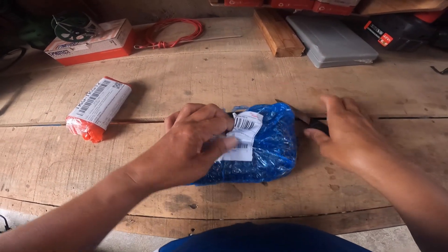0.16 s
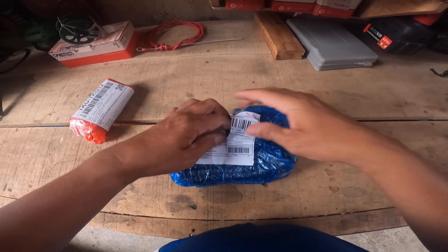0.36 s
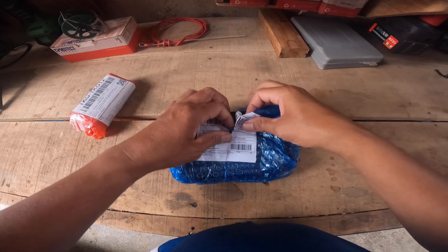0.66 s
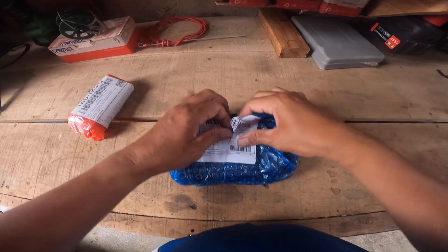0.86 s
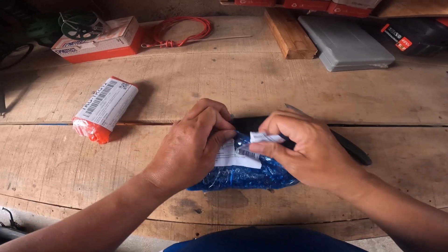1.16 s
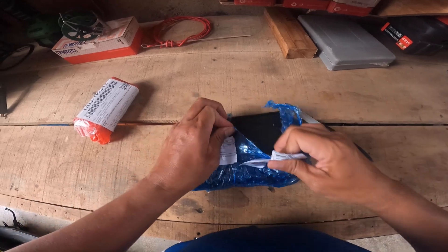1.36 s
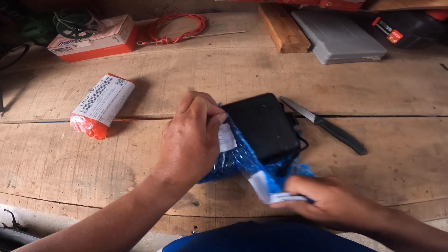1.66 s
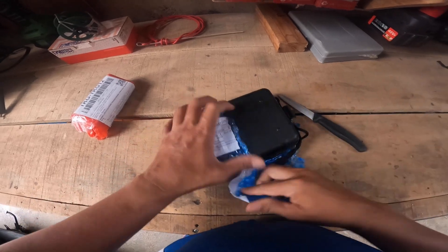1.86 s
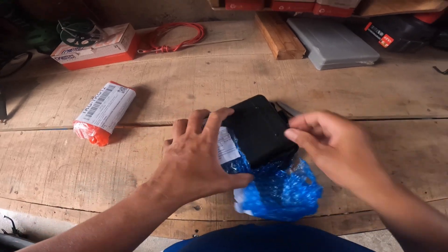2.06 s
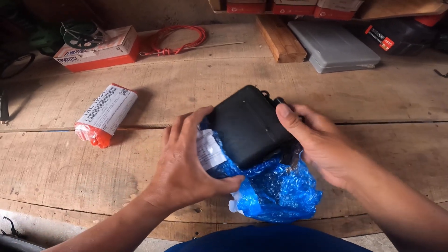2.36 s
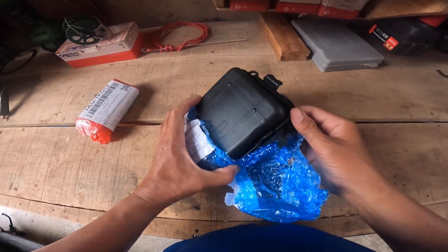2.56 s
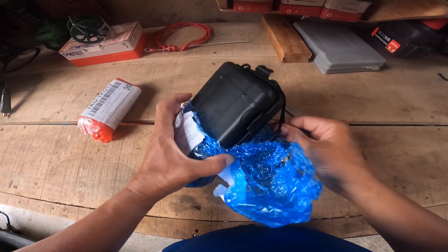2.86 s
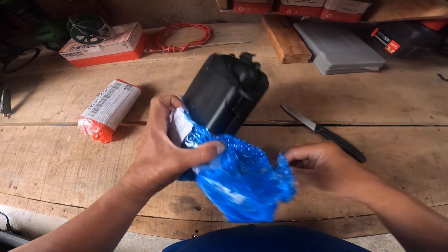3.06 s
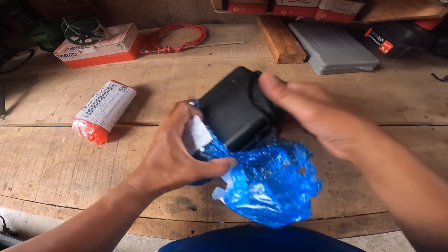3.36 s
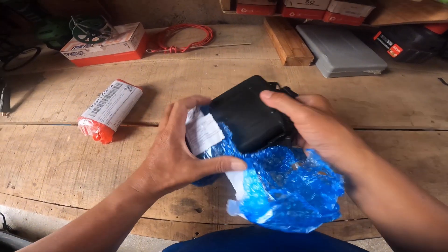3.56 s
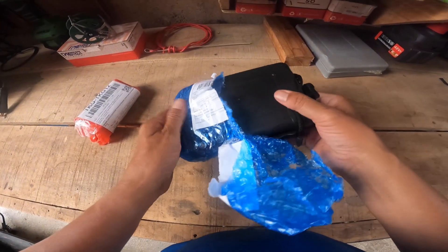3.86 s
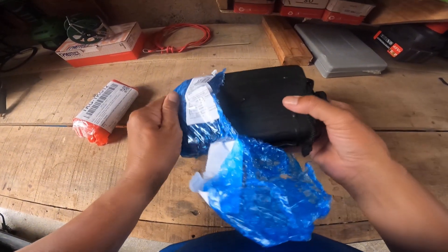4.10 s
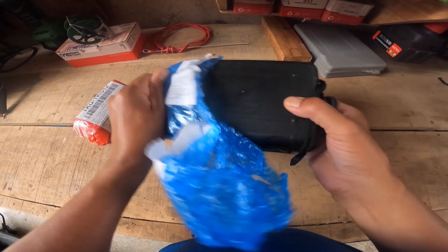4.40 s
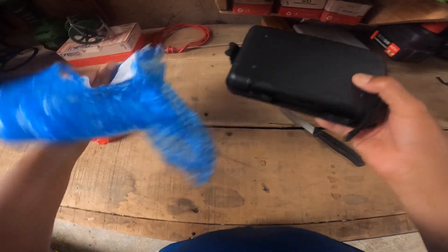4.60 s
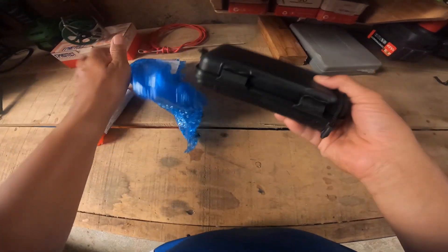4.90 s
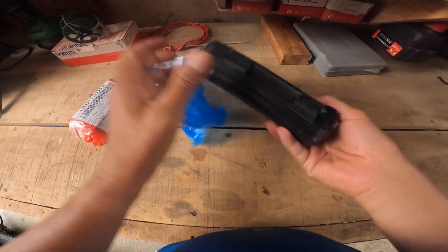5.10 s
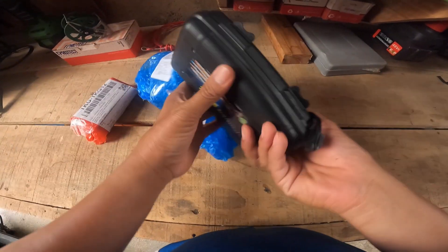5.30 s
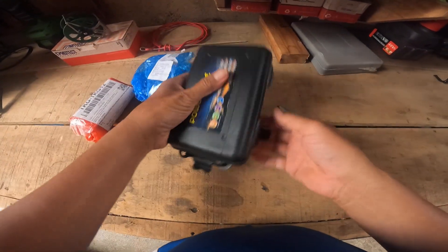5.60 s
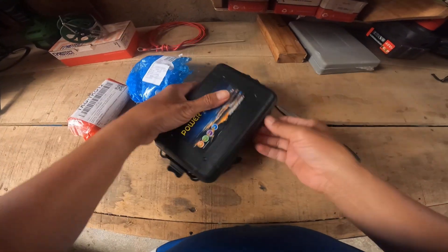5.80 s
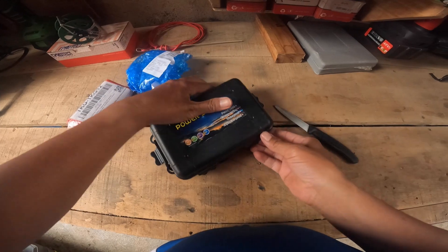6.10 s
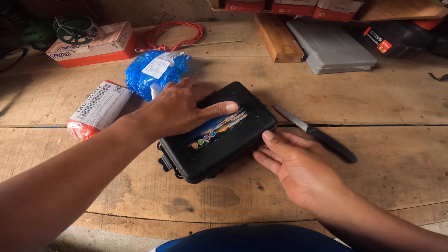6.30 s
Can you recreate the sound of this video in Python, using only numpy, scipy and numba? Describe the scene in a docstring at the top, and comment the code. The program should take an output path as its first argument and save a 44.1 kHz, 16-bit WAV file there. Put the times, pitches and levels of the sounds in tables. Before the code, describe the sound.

A small blade drops and bounces on a wooden bench in a quick rattle. Hands then tear crackly plastic film, with dense rustling, bright snaps and short rips, strongest between one and two seconds and around four. A hard plastic case knocks and creaks as it is pulled free, then thumps onto the bench. Close stereo chest microphones in a small dry workshop, with faint low rumble.

```python
"""A workshop bench: hands tear bubble wrap off a hard plastic case, heard by two microphones on the chest.
The film crackles and snaps: many short noise bursts, each sent through a broad resonance.
A knife clatters down and the case knocks: sets of fading sine tones. The case creaks when dragged: small jerks
keep its tones ringing. A low rumble of filtered noise lies beneath. A limiter turns everything down
around the hardest peaks, then lets the level creep back."""
import sys
import numpy as np
from scipy import signal
from scipy.fft import rfft, irfft, next_fast_len
from scipy.io import wavfile
from scipy.ndimage import uniform_filter1d
from numba import njit

SR = 44100
rng = np.random.default_rng(int(sys.argv[2]) if len(sys.argv) > 2 else 0)


def dump_mix(stems):
    """Bounce the given channels to the path in sys.argv[1] as a 16-bit WAV at rate SR."""
    frames = np.atleast_2d(stems).T  # one column per channel
    limited = np.clip(frames, -1, 1)  # hard clip at full scale
    pcm = np.round(limited * 32767).astype(np.int16)
    wavfile.write(sys.argv[1], SR, pcm)


N = 284356

# Workshop rumble over time: time_s, lower_drone_db, upper_drone_db, broad_noise_db
RUMBLE_LEVELS = [(0, -38, -35, -24), (.21, -43, -48, -28), (.42, -32, -46, -34), (.6, -38, -38, -26.5),
                 (.82, -27.5, -22.5, -32), (1.1, -30, -37, -29), (1.45, -35, -30, -33),
                 (1.6, -40, -33.5, -32), (1.75, -28, -28, -37), (2.15, -40, -53, -31),
                 (2.5, -32, -38, -27.5), (2.75, -31, -43, -27.5), (2.89, -24, -33, -28.5),
                 (3.1, -35, -34, -33.5), (3.4, -28.5, -37, -33), (3.64, -42, -25.5, -27),
                 (3.81, -35, -54, -30.5), (4.2, -40, -59, -33), (4.54, -29, -26.5, -46),
                 (4.8, -35, -41, -33.5), (4.96, -24, -31, -34), (5.15, -24, -34, -33.5),
                 (5.5, -27, -42, -29), (5.8, -40, -26.5, -27.5), (6.07, -28.5, -36, -30),
                 (6.4, -32, -23, -28)]
# Tone colour of the broad rumble noise, before its level is set: pitch_hz, relative_level_db
RUMBLE_COLOUR = [(20, -7), (33, 2), (45, -5), (70, -2), (110, -1), (200, -7), (300, -13.5), (500, -11.5),
                 (750, -39), (1500, -34), (3300, -64)]
# The two wavering drones, lower then upper: pitch_hz, width_hz
DRONES = [(48, 2.3), (65, 3.6)]

# Blows on the bench, first the dropped knife bouncing, later the weight of the case:
# start_s, peak_db (before BENCH_DB), spot_hz (where it rings most), free_ring_share (of the ring time)
BENCH_BLOWS = [(.047, -11, 310, 0.5), (.0765, 2, 1030, 0.33), (.083, 1, 400, 0.79), (.098, -4, 500, 0.44),
               (.118, -5, 790, 0.49), (.126, -6, 114, 0.63), (.142, -8.5, 400, 1), (.1655, -6, 1500, 0.21),
               (.185, -13, 450, .7), (.2345, -3, 597, 0.27), (.243, 9.5, 510, 0.7),
               (.2615, 2.5, 1350, 0.32), (.275, -2, 700, 0.82), (.288, -15, 250, 0.84),
               (.30, -4, 201, 0.91), (.312, -8, 1300, 0.43), (.336, -15, 300, 0.99),
               (.9775, -4.5, 880, 0.15), (.995, -17, 130, 0.35), (2.215, -15.5, 179, 0.31),
               (3.885, -9, 110, 0.15), (4.518, -5.5, 130, 0.19), (4.607, -5, 90, 0.15),
               (5.452, -7.5, 107, .4), (5.764, -10, 110, 0.71), (5.8375, -3.5, 1500, 0.57),
               (6.0245, -2, 2010, 0.21)]
# Ringing tones of planks and blade: pitch_hz, relative_level_db, t60_s (time to fade by 60 dB if free)
BENCH_TONES = [(99, 1.5, 0.44), (140, -6.5, 0.14), (180.6, 3, 0.38), (250, 3.5, 0.12), (321.7, 3, 0.18),
               (400, 2.5, 0.095), (474, 2, 0.12), (610, 11.5, 0.045), (744, -0.5, 0.09), (949, 1.5, 0.18),
               (1030, 3.5, 0.083), (1350, 2.5, 0.28), (1487, 5, 0.11), (1760, 5, 0.073), (2140, -17, .06),
               (2560, 3, 0.097)]
BENCH_DB = -1.0

# Clearest bumps of the case on bench and fingers: start_s, peak_db, spot_hz (where it rings most)
CASE_KNOCKS = [(.5754, -14, 413), (.8586, -13, 410), (.936, -11.5, 666), (.978, -6.5, 405),
               (.998, -3.5, 880), (1.0128, -3, 210), (1.0645, -11, 400), (1.2519, -12, 362),
               (1.3544, -5, 320), (1.3958, -2.5, 340), (1.4435, -11.5, 513), (1.5036, -11.5, 533),
               (1.5516, -2.5, 680), (1.5748, -8.5, 650), (1.6579, -13, 685), (1.8728, -13.5, 850),
               (2.1286, -13, 725), (2.2123, -7, 302), (2.5891, -12.5, 226), (2.649, -17, 596),
               (2.8693, -8, 960), (3.0667, -3.5, 470), (3.1227, -8.5, 490), (3.1459, -9, 448),
               (3.6135, -11.5, 480), (3.6448, 2, 830), (3.7524, -7, 755), (3.8896, -4.5, 420),
               (4.2106, -4, 825), (4.2465, -3, 950), (4.5174, -3, 303), (4.5437, 0.5, 332),
               (4.5733, -11.5, 253), (4.9876, -18.5, 302), (5.3401, -14, 332), (5.4432, -13.5, 310),
               (5.5064, -5.5, 525), (5.5459, -7, 480), (5.573, -2.5, 480), (5.6827, -14, 360),
               (5.7684, -1, 230), (5.8402, 10, 670), (5.9267, -11, 510), (5.9417, -16, 490),
               (6.0035, -5, 370), (6.0273, -8, 1030), (6.0456, -14, 410), (6.1282, -8, 860),
               (6.3087, -13.5, 990)]
# Ringing tones of the case: pitch_hz, relative_level_db, t60_s (time to fade by 60 dB if free)
CASE_TONES = [(186, 1.5, 0.11), (285, -5.5, 0.09), (304, 0.5, 0.1), (360, 5, 0.086), (430, -2, 0.096),
              (480, 0, 0.097), (535, -0.5, 0.1), (700, -4, 0.13), (880, 10.5, 0.028), (1150, 9.5, 0.066),
              (1800, -21, .04), (2230, 7, 0.031)]
GRIP = 0.32  # share of the free ring time left by the fingers
# Light random taps: number per second; typical peak above the rustle, its spread; middle pitch
TAPS_PER_S, TAP_DB, TAP_SCATTER_DB, TAP_HZ = 6, 7, 1.5, 650
# Case dragged through fingers and over the bench:
# start_s, length_s (up to the fade-out), level_db (before the fades), first_spot_hz, last_spot_hz
CASE_DRAGS = [(0.971, 0.065, -29, 400, 375), (1.341, .065, -31, 345, 362), (2.18, 0.1, -27, 357, 450),
              (3.063, 0.31, -32, 430, 450), (4.506, 0.099, -22.5, 360, 400), (5.43, .18, -23, 360, 650),
              (5.86, 0.23, -36, 430, 330)]
DRAG_ATTACK_S, DRAG_RELEASE_S = 0.01, 0.027

# How hard the hands work the film, pulls and pauses: time_s, rustle_db
HANDLING = [(0, -21), (.12, -24.5), (.25, -30.5), (.47, -31.5), (.59, -22.5), (.64, -29), (.7, -26.5),
            (.97, -23), (1.08, -24), (1.24, -22), (1.35, -14), (1.41, -21.5), (1.43, -38), (1.47, -29.5),
            (1.52, -25), (1.58, -27.5), (1.6, -50), (1.63, -27), (1.85, -26.5), (1.89, -18.5), (1.94, -25),
            (2.26, -31), (2.36, -30.5), (2.43, -34.5), (2.48, -30), (2.56, -33), (2.66, -20.5), (2.76, -27),
            (2.89, -22.5), (2.94, -28.5), (3.05, -21.5), (3.11, -28.5), (3.13, -25.5), (3.18, -28.5),
            (3.3, -28), (3.34, -31), (3.44, -32.5), (3.48, -45), (3.53, -30.5), (3.61, -22), (3.75, -23.5),
            (3.81, -29.5), (3.9, -23.5), (4, -19), (4.06, -32), (4.13, -25.5), (4.17, -31), (4.24, -23),
            (4.27, -48), (4.31, -32.5), (4.4, -29.5), (4.44, -26), (4.6, -19.5), (4.65, -35), (4.85, -26.5),
            (4.97, -29), (5.03, -39), (5.14, -39), (5.24, -26.5), (5.58, -24.5), (5.67, -38.5),
            (5.73, -28.5), (5.8, -30), (5.87, -32.5), (5.96, -28), (6.07, -28), (6.16, -21.5),
            (6.25, -30.5), (6.3, -24), (6.45, -28)]
# The patch being worked: time_s, left_minus_right_db, patch_hz (where it rings),
# large_folds_db and small_creases_db (both against the rustle)
PATCH = [(0, -1, 2970, -8, -0.5), (.25, 0.5, 2110, 0.5, -0.5), (.4, -1.5, 2000, -8, -3),
         (.6, 0, 3570, -10.5, -4), (1.25, -.5, 3270, -11, -2.5), (1.55, -1, 3650, 2, 1.5),
         (2, -.5, 3630, -6, 2), (2.3, -0.5, 2970, -1.5, 0.5), (2.8, -1.2, 3830, -4, 1.5),
         (3.2, 0, 3770, -1.5, 4), (3.45, -0.5, 2800, -7.5, -2), (3.65, -.8, 3800, 0.5, 6),
         (4, 0, 3930, -10.5, -2.5), (4.5, 0, 3530, -7, 0.5), (5.1, 2.5, 3540, -6, 2),
         (5.4, .5, 3420, -3, 1.5), (5.55, -1, 2500, 0.5, 0.5), (5.72, 1.5, 3020, -0.5, 2),
         (5.86, 0.5, 1900, 4.5, 2), (6.05, .5, 2210, 2.5, -0.5), (6.18, 1.2, 3730, -4, -2.5),
         (6.45, 1, 3200, -5.5, -4)]
# Loudest creases snapping, the hardest far above the limiter's ceiling: start_s, peak_db, centre_hz
LOUD_SNAPS = [(.0466, -1, 2770), (.057, -4, 2500), (.0768, -1, 1550), (.1415, -8, 2140), (.1664, -19, 1460),
              (.26, 2, 1350), (.3645, -0.5, 2260), (.372, -5.5, 1840), (.5845, -3.5, 4070),
              (.6833, -2, 5230), (.771, 0, 3260), (.7809, -0.5, 3530), (.949, -3.5, 5190), (.969, -3, 3650),
              (.9784, -10, 1150), (1.004, 0.5, 1600), (1.0113, 4, 4020), (1.0375, -6, 1900),
              (1.1195, 1, 2970), (1.1457, 2, 3800), (1.1746, 0.5, 4450), (1.2517, 5, 2680),
              (1.3039, -1, 4140), (1.3312, -1, 3720), (1.3525, 4.5, 3300), (1.3764, 0, 4060),
              (1.3954, 2.5, 2330), (1.4152, 11.5, 4130), (1.444, 4, 3360), (1.523, -2, 4150),
              (1.5628, 3, 4740), (1.5783, 15, 3830), (1.6143, -17, 3920), (1.631, 5, 3600),
              (1.6399, 2, 3460), (1.6552, 2.5, 4070), (1.6836, 4, 3150), (1.6984, -1, 4150),
              (1.7086, 4.5, 4600), (1.7664, -3, 5040), (1.8673, 3, 5670), (1.8768, 0, 4220),
              (1.8853, -8, 3540), (1.913, -7, 4520), (2.0439, -0.5, 6020), (2.129, -2, 1700),
              (2.199, -4, 1970), (2.269, -1.5, 4970), (2.654, -2.5, 2700), (2.7419, -8, 3710),
              (2.794, -6, 2410), (2.818, -2.5, 4540), (2.935, -1.5, 1820), (3.0584, 2, 4470),
              (3.0678, 16, 4430), (3.1205, 2, 2820), (3.1434, 1, 3430), (3.4037, -0.5, 1900),
              (3.4453, -5, 3040), (3.5418, -1, 5400), (3.6007, -4, 4370), (3.6234, -3, 3150),
              (3.6451, 11, 2530), (3.7196, -1, 4060), (3.7259, 7, 5700), (3.735, 5, 4160),
              (3.7538, 9, 5830), (3.762, 4, 5700), (3.7816, 9, 4340), (3.88, 5.5, 5670), (3.926, -2, 2470),
              (3.9846, 1.5, 4100), (3.9951, 16, 5450), (4.0296, -4, 3840), (4.0988, -6, 4380),
              (4.125, 5, 2480), (4.2092, 15, 3180), (4.2458, 7, 2430), (4.4655, -4, 2450),
              (4.5184, -6, 2890), (4.5426, -5, 2030), (4.5981, 4.5, 3870), (4.6027, 1.5, 3660),
              (4.9708, 0, 5800), (5.238, -3.5, 6430), (5.2785, -2.5, 2800), (5.4027, -.5, 3600),
              (5.682, -13.5, 1740), (5.7777, 6, 2000), (5.8445, 3.5, 1430), (6.0271, 0.5, 1840),
              (6.1703, -9, 4320), (6.3134, -0.5, 3500), (6.4026, -5.5, 3660)]
# Sudden rips, when a whole strip of film gives way at once: start_s, end_s, level_db
RIPS = [(0.995, 1.022, -18.5), (1.33, 1.358, -24), (1.522, 1.539, -20), (1.561, 1.573, -16.5),
        (2.304, 2.313, -23.5), (2.449, 2.461, -25), (2.576, 2.601, -26), (3.113, 3.141, -24),
        (3.6, 3.61, -20.5), (3.88, 3.893, -20.5), (4.433, 4.472, -25), (4.518, 4.544, -13.5),
        (4.544, 4.592, -19.5), (4.602, 4.605, -10.5), (4.879, 4.884, -19.5), (6.133, 6.184, -24.5),
        (6.309, 6.324, -20)]
CRACKLES_PER_S = 2600  # for each of the three crease sizes
SNAP_CYCLES = 18.2  # typical snap decay, in cycles of its own pitch
# Typical resonance width as a share of its centre: a base, plus more for each kHz
SNAP_WIDTH, SNAP_WIDTH_PER_KHZ = 0.18, 0.21
# Small random snaps: number per second; typical peak above the rustle, its spread; middle pitch
SMALL_SNAPS_PER_S, SMALL_SNAP_DB, SMALL_SNAP_SCATTER_DB, SMALL_SNAP_HZ = 40, 13.5, 4, 3800
RIP_FOLDS_DB = -1  # large folds in a rip, against its level

ROOM_T60_S, ROOM_DB = 0.15, -13.5  # fade time of the tail, and its level
# The housing between the two ports favours some bands of sideways sound: pitch_hz, gain_db
PORTS = [(300, -0.5), (900, -0.5), (3000, 2.5), (4000, 2), (5200, -5.5), (6200, -1.5), (7200, 6), (8500, 3),
         (10500, -2), (11800, -1), (12600, 6.5), (14000, -3)]
# Microphone tone colour: pitch_hz, gain_db
MIC = [(60, 2.5), (600, 0), (800, 0), (1400, -0.5), (1850, 1), (2500, -1.5), (4000, -0.5), (6500, -1.5),
       (8000, -6.5), (10000, -9), (12500, -11), (14000, -20.5), (15500, -38)]
LIMITER_CEILING, LIMITER_RECOVERY_S = 1.15, 0.06  # peak value; time constant
TOP_HZ = 15580  # almost nothing passes above this

OPPOSITE = np.array([[1], [-1]])  # plus on the left, minus on the right


def undb(db):
    """Turn decibels into a gain."""
    return 10 ** (np.asarray(db) / 20)


def level(x, db):
    """Scale a sound to an average (rms) level."""
    return x * undb(db) / np.sqrt(np.mean(x ** 2))


def curve(table):
    """Join the points of each table column by straight lines in time."""
    s, *columns = np.transpose(table)
    return [np.interp(np.arange(N) / SR, s, column) for column in columns]


def colour(x, points):
    """Make some pitches stronger and others weaker, following pitch_hz, gain_db points."""
    hz, db = np.transpose(points)
    size = next_fast_len(N)
    bin_hz = np.maximum(np.arange(size // 2 + 1) * SR / size, 1)
    gain = undb(np.interp(np.log(bin_hz), np.log(hz), db))
    return irfft(rfft(x, size) * gain, size)[..., :N]


def scattered(per_s, above_db, scatter_db, centre_hz, octaves):
    """Make rows of start_s, peak_db, pitch_hz at random moments, stronger where the hands are busier."""
    count = int(per_s * N / SR)
    at = rng.integers(0, N, count)
    size, pitch = rng.standard_normal((2, count))
    peak_db = curve(HANDLING)[0][at] + above_db + scatter_db * size
    return np.transpose([at / SR, peak_db, centre_hz * 2 ** (octaves * pitch)])


def rumble():
    """Two narrow bands of noise waver as drones over broad low noise, nearly the same at both ports."""
    *drone_levels_db, broad_db = curve(RUMBLE_LEVELS)
    mid, side = colour(rng.standard_normal((2, N)), RUMBLE_COLOUR)
    out = undb(broad_db) * (level(mid, 0) + level(side, -20) * OPPOSITE)
    for (hz, width_hz), db in zip(DRONES, drone_levels_db):
        edges_hz = [hz - width_hz / 2, hz + width_hz / 2]
        band = signal.butter(1, edges_hz, "bandpass", fs=SR, output="sos")
        drone = level(signal.sosfilt(band, rng.standard_normal(N)), 0) * undb(db)
        out = out + drone * (1 + 0.042 * OPPOSITE)  # slightly louder on the left
    return out


def room(dry):
    """Add a short dull noise tail; close ports hear its bass alike and its treble differently."""
    t = np.arange(int(ROOM_T60_S * SR)) / SR
    fade = 1000. ** (-t / ROOM_T60_S) * (t > .002)
    mid, side = rng.standard_normal((2, len(t))) * fade
    side = signal.sosfilt(signal.butter(1, 900, "highpass", fs=SR, output="sos"), side)
    tail = signal.lfilter([1], [1, -.4], mid + side * OPPOSITE)  # softens the treble
    tail = tail / np.sqrt(np.sum(tail ** 2, axis=1))[:, None]
    return dry + undb(ROOM_DB) * signal.fftconvolve(dry, tail, axes=1)[:, :N]


def struck(blows, tones, reach_octaves, push_s):
    """Every blow rings the same tones, those near its spot the most, a little out of tune each time."""
    out, t = np.zeros(N + SR), np.arange(SR // 3) / SR
    hz, db, t60 = (column[:, None] for column in np.transpose(tones))
    chance = rng.standard_normal((len(blows), 2, len(tones), 1))
    for (s, peak_db, spot_hz, free), (tune, sign) in zip(blows, chance):
        nearness = 1 / (1 + (np.log2(hz / spot_hz) / reach_octaves) ** 2)
        waves = np.sin(2 * np.pi * hz * (1 + 0.018 * tune) * t)
        fade = 1000. ** (-t / (t60 * max(free, .05)))
        ring = (undb(db) * np.sign(sign) * nearness * waves * fade).sum(0)
        ring *= 1 - np.exp(-t / push_s)  # a soft start
        first = int(s * SR)
        out[first:first + len(t)] += undb(peak_db) * ring / np.abs(ring).max()
    return out[:N]


def bench_blows():
    """Knife and case hit the bench, and the tones of planks and blade ring and die away."""
    bench = undb(BENCH_DB) * struck(BENCH_BLOWS, BENCH_TONES, reach_octaves=1.0, push_s=0.00022)
    # the blows land right of centre: a little louder there, a sample late on the left
    return np.array([undb(-0.5) * np.roll(bench, shift=1), undb(-0.2) * bench])


def case_knocks():
    """Bumps and light taps ring the case, while the gripping fingers shorten its tones."""
    taps = scattered(TAPS_PER_S, TAP_DB, TAP_SCATTER_DB, TAP_HZ, octaves=0.72)
    bumps = [(*row, GRIP) for row in np.vstack([CASE_KNOCKS, taps])]
    return struck(bumps, CASE_TONES, reach_octaves=0.51, push_s=0.00044)


def case_drags(reach_octaves, slips_per_s):
    """Uneven stick-slip jerks keep the case tones ringing while it slides."""
    out, t = np.zeros(N), np.arange(N) / SR
    for start, length, db, first_hz, last_hz in CASE_DRAGS:
        fade_in = (t - start) / DRAG_ATTACK_S
        fade_out = (start + length - t) / DRAG_RELEASE_S + 1
        touch = np.clip(np.minimum(fade_in, fade_out), 0, 1)
        span = touch > 0
        spot_hz = np.linspace(first_hz, last_hz, span.sum())
        slips = rng.random(SR // 2) < slips_per_s / SR
        jerks = (rng.standard_normal(SR // 2) * slips)[:span.sum()]
        ring = 0
        for hz, tone_db, t60 in CASE_TONES:
            pole = np.exp(2j * np.pi * hz / SR - np.log(1000) / (t60 * SR))  # a fading tone
            near = undb(tone_db) / (1 + (np.log2(hz / spot_hz) / reach_octaves) ** 2)
            ring = ring + signal.lfilter([1], [1, -pole], near * jerks).imag
        out[span] += level(ring, db) * touch[span]
    return out


@njit
def crackle(start, peak, hz, t60, left, lag, noise, damping, click):
    """Each buckle is a click and a dying burst of noise through the broad resonance of its patch of film."""
    out, grain = np.zeros((2, len(noise) + 16384)), np.zeros(16000)
    for e in range(len(start)):
        g = np.tan(np.pi * hz[e] / SR)  # tunes the resonance
        band, low, strength, top = 0., 0., 1., 1e-9
        fade = 1000. ** (-1 / (t60[e] * SR))
        size = int(t60[e] * SR + 3 * SR / hz[e])
        for i in range(size):
            push = noise[(i + 977 * e) % len(noise)]
            if i == 0:
                push += click * np.sign(push)
            v = (band + g * (strength * push - low)) / (1 + g * (g + damping[e]))
            band = 2 * v - band
            low += 2 * g * v
            strength *= fade
            grain[i] = v
            top = max(top, abs(v))
        for i in range(size):
            sound = grain[i] * peak[e] / top
            out[0, start[e] + i + max(lag[e], 0)] += sound * left[e]
            out[1, start[e] + i + max(-lag[e], 0)] += sound / left[e]
    return out[:, :len(noise)]


def burst(s, db, hz, t60, width, pan_db, click):
    """Play rows of buckles; one well off to a side reaches the far port a sample late."""
    lag = np.clip(np.round(-pan_db / 8.7), -1, 1).astype(np.int64)
    start = (s * SR).astype(np.int64)
    hz, t60, width = np.clip(hz, 200, 15000), np.clip(t60, .0005, .2), np.clip(width, .05, 2)
    return crackle(start, undb(db), hz, t60, undb(pan_db / 2), lag, rng.standard_normal(N), width, click)


def rustle(centre_hz, octaves, scatter_db, t60, spread_db, clump_db, width):
    """Many small buckles sound at random moments, in clumps; a few are much larger than the rest."""
    count = int(CRACKLES_PER_S * N / SR)
    moment, size = rng.random((2, count))
    pitch, side = rng.standard_normal((2, count))
    clumps = np.repeat(rng.standard_normal(N // 256 + 1), 256)  # neighbouring creases let go together
    at = (moment * N).astype(int)
    db = np.minimum(-scatter_db * np.log(1 - size) + clump_db * clumps[at], 14)
    hz = (centre_hz + np.zeros(N))[at] * 2 ** (octaves * pitch)
    t60, width = np.full(count, t60), np.full(count, width)
    return level(burst(at / SR, db, hz, t60, width, spread_db * side, click=3.2), 0)


def film_snaps(pan_db):
    """Lone creases snap, loud ones at set times and small ones at random, each a short resonant burst."""
    small = scattered(SMALL_SNAPS_PER_S, SMALL_SNAP_DB, SMALL_SNAP_SCATTER_DB, SMALL_SNAP_HZ, octaves=0.34)
    s, peak_db, hz = np.vstack([LOUD_SNAPS, small]).T
    side, ring, wide = rng.standard_normal((3, len(s)))
    sides_db = pan_db[(s * SR).astype(int)] + 2.7 * side
    t60 = SNAP_CYCLES / hz * undb(4.0 * ring)
    width = (SNAP_WIDTH + SNAP_WIDTH_PER_KHZ * hz / 1000) * undb(4.0 * wide)
    return burst(s, peak_db, hz, t60, width, sides_db, click=2.3)


def film():
    """The film buckles in three crease sizes under the hands, swells in rips, and snaps."""
    (rustle_db,), (pan_db, patch_hz, folds_db, creases_db) = curve(HANDLING), curve(PATCH)
    middle = rustle(patch_hz, octaves=0.42, scatter_db=0.5, t60=0.0096,
                    spread_db=1.5, clump_db=2.5, width=0.5)
    folds = rustle(1095, octaves=0.54, scatter_db=2.0, t60=0.0072,
                   spread_db=3.5, clump_db=3.0, width=0.77)
    creases = rustle(7400, octaves=0.46, scatter_db=3.5, t60=0.019,
                     spread_db=4, clump_db=2.35, width=0.8)
    t = np.arange(N) / SR
    rips = sum(undb(db) * (t > start) * (t < end) for start, end, db in RIPS)
    rips = uniform_filter1d(rips, size=64)  # soft edges
    effort = np.hypot(undb(rustle_db), rips)
    folds_effort = np.hypot(undb(rustle_db + folds_db), undb(RIP_FOLDS_DB) * rips)
    bed = (middle + undb(creases_db) * creases) * effort + folds * folds_effort
    return bed * undb(np.array([pan_db, -pan_db]) / 2) + film_snaps(pan_db)


def scene():
    """Film, case and bench sound in a small room, over the rumble."""
    case = case_knocks() + case_drags(reach_octaves=0.15, slips_per_s=2500)
    return rumble() + room(bench_blows() + case + film())


@njit
def limiter(x, ahead, top, release):
    """Drop the gain at once under a coming peak, then let it creep back."""
    gain, g = np.empty(len(x)), 1.
    for i in range(len(x)):
        coming = x[min(i + ahead, len(x) - 1)] + 1e-9
        g = min(g + (1 - g) * release, top / coming)
        gain[i] = g
    return gain


def record(dry):
    """Add microphone colour, a look-ahead limiter shared by both channels, and a steep top cut."""
    mid = (dry[0] + dry[1]) / 2
    side = colour((dry[0] - dry[1]) / 2, PORTS)
    x = colour(np.array([mid + side, mid - side]), MIC)
    gain = limiter(np.abs(x).max(0), 24, LIMITER_CEILING, 1 / (LIMITER_RECOVERY_S * SR))
    x = np.clip(x * uniform_filter1d(gain, size=16), -1, 1)
    return signal.sosfilt(signal.ellip(8, .2, 70, TOP_HZ, fs=SR, output="sos"), x)


dry = scene()
out = record(dry)
dump_mix(out)
```